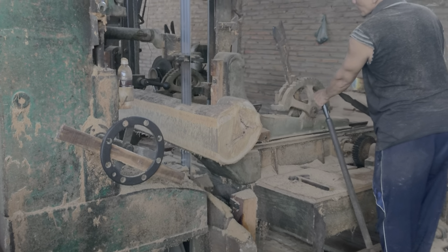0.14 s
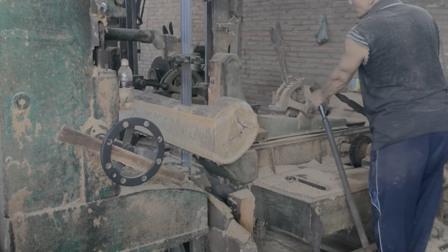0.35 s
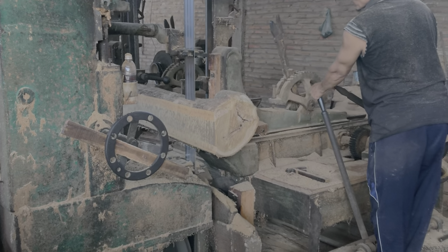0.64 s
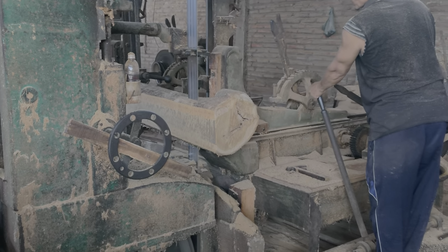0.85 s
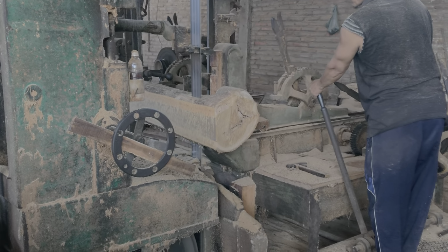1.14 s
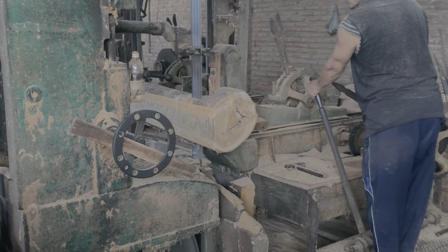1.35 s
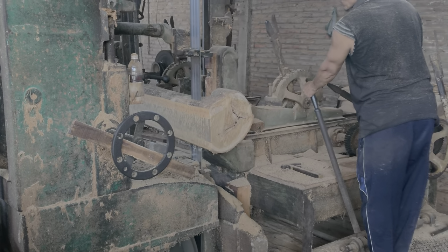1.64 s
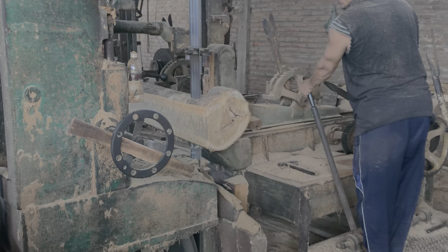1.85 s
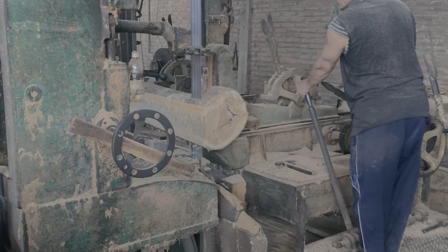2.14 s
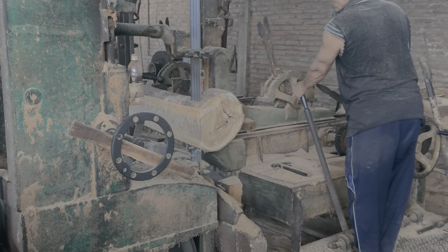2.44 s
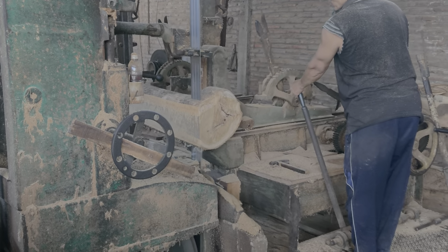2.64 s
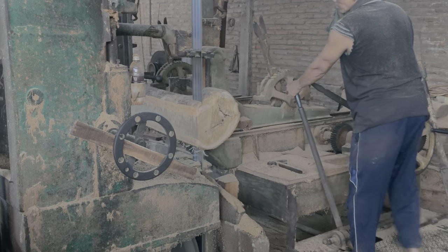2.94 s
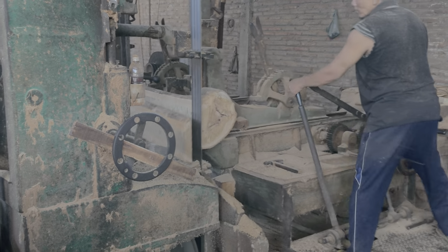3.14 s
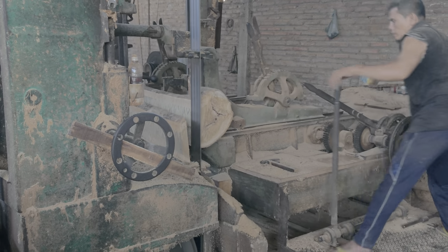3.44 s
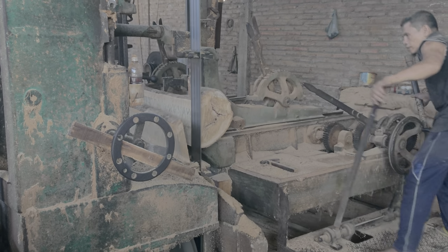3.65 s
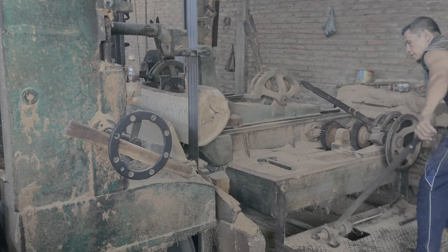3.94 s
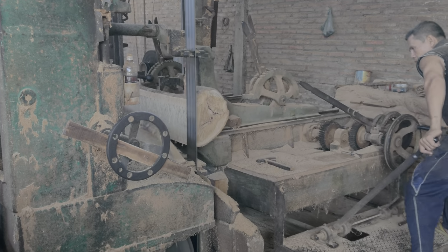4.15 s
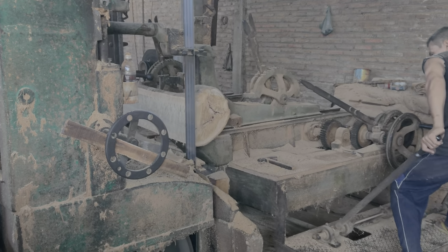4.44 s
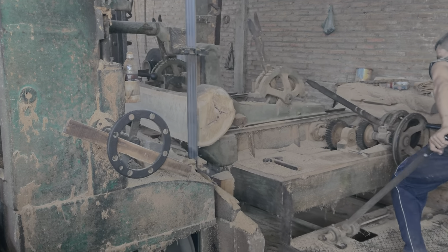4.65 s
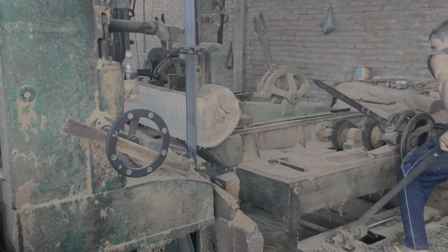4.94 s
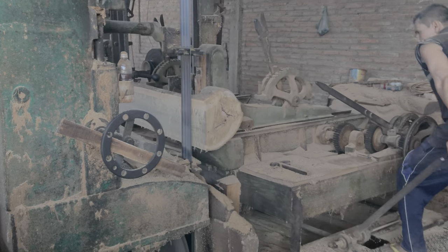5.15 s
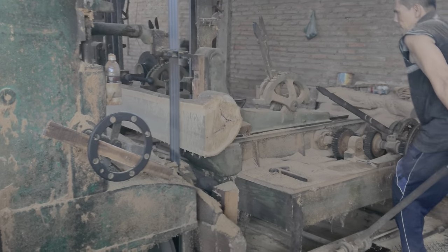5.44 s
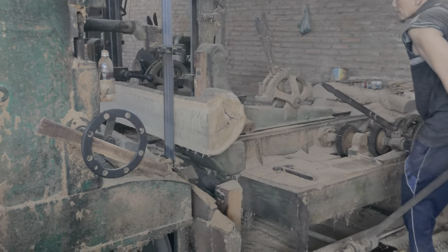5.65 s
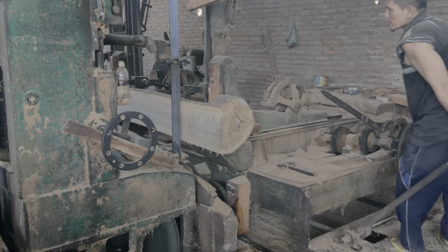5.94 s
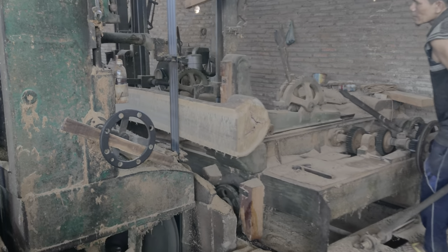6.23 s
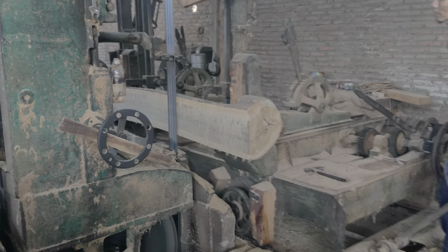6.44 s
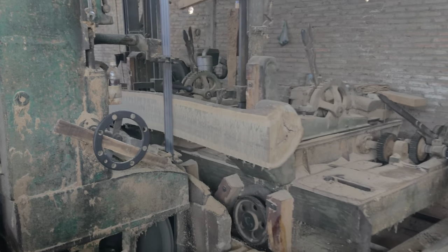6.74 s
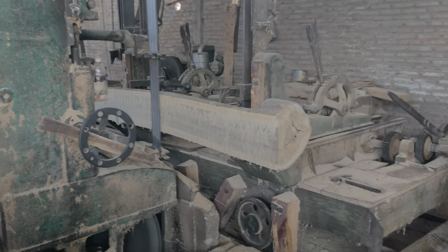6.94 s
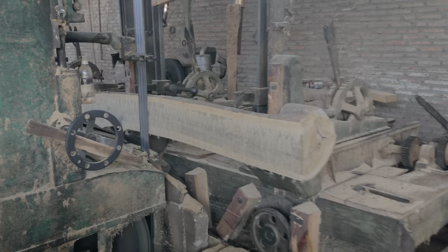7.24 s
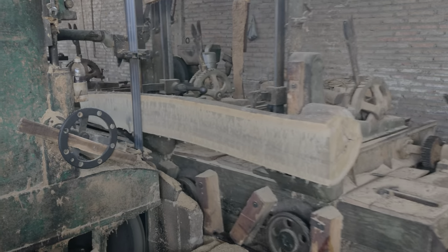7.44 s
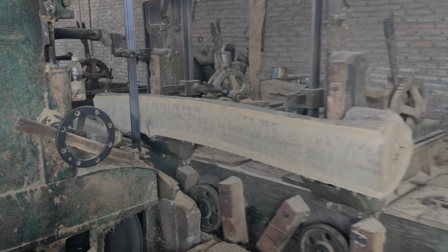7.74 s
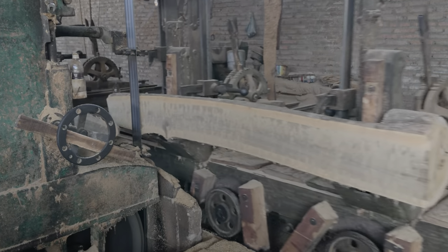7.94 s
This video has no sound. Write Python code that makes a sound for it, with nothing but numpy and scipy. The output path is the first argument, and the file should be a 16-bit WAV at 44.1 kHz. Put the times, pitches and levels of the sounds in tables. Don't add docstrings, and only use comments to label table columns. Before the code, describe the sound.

A big band saw rips a log with loud buzzing hiss, then exits the wood; the low hum fades and the idle blade rings and throbs.

```python
import sys
import numpy as np
from scipy import signal
from scipy.fft import rfft, irfft
from scipy.io import wavfile

SR = 44100
rng = np.random.default_rng(int(sys.argv[2]) if len(sys.argv) > 2 else 0)


def gain_from_db(level_db):
    decades = np.asarray(level_db, float) / 20
    return 10 ** decades


def wrap_up_sound(samples):
    columns = np.atleast_2d(samples).T
    tamed = np.clip(columns, -1, 1)
    steps = np.round(tamed * 32767).astype(np.int16)
    wavfile.write(sys.argv[1], SR, steps)


N = 357210
TIME_S = np.arange(N) / SR


def rms_one(x):
    return x / np.sqrt(np.mean(x ** 2))


def at_bins(points):
    hz = np.fft.rfftfreq(N, 1 / SR) + 1
    table_hz, table_db = np.array(points).T
    return np.interp(np.log(hz), np.log(table_hz), table_db), hz


def drift(rate):
    stride, settling = 40, 2000
    pole = np.exp(-2 * np.pi * rate * stride / SR)
    coarse = rng.standard_normal(N // stride + settling + 2)
    slow = signal.lfilter([1], [1, -2 * pole, pole * pole], coarse)[settling:]
    return np.interp(np.arange(N) / stride, np.arange(len(slow)), rms_one(slow))


def body_noise(colour, modes, patchy_db, count):
    db, hz = at_bins(colour)
    low_hz, high_hz = colour[0][0], colour[-1][0]
    inside = (hz > low_hz) & (hz < high_hz)
    power = 1
    for mode_hz, width_hz, top_db in modes:
        power = power + (gain_from_db(2 * top_db) - 1) / (1 + (2 * (hz - mode_hz) / width_hz) ** 2)
    body = rfft(rng.standard_normal(N)) * gain_from_db(db) * np.sqrt(power) * inside
    place = (count - 1) * np.log(hz / low_hz) / np.log(high_hz / low_hz)
    out = np.zeros(N)
    for k in range(count):
        band = irfft(body * np.clip(1 - np.abs(place - k), 0, 1), N)
        out += band * gain_from_db(patchy_db * drift(12.5))
    return rms_one(out)


def cycles(rate_hz, wobble_hz, wobble_rate):
    return 2 * np.pi * np.cumsum(rate_hz + wobble_hz * drift(wobble_rate)) / SR


def partial(phase, db, unsteady_db):
    level = np.sqrt(2) * gain_from_db(db + unsteady_db * drift(9.8))
    return level * np.sin(phase + rng.uniform(0, 2 * np.pi))


def since_exit():
    return np.clip(TIME_S - 3.022, 0, None)


def idling():
    t = since_exit()
    governor_s, run_up_s = 0.1205, 1.55
    remaining = run_up_s * np.exp(-t / run_up_s) - governor_s * np.exp(-t / governor_s)
    return 1 - remaining / (run_up_s - governor_s)


def machine_db(in_wood_db, let_go_db, speed_db):
    let_go = 1 - np.exp(-since_exit() / 0.03)
    return in_wood_db + let_go_db * let_go + speed_db * idling()


# (frequency [Hz], level [dB per Hz])
SELF_NOISE = [(20, -10), (60, 0), (200, -5.5), (1000, -14), (3500, -18.5), (6500, -33), (9500, -27),
              (16000, -24)]


def self_noise():
    return gain_from_db(-71.5) * body_noise(SELF_NOISE, [], patchy_db=1.0, count=2)


# (multiple of firing rate [1], loaded level [dB], idling level [dB])
UPPER_ORDERS = [(3, -36, -44), (4, -40, -36.5), (5, -46.5, -42), (6, -43, -43)]
# (turns per firing [1], loaded level [dB], idling level [dB])
GEARED_LINES = [(1.18, -54, -41), (1.62, -54, -42), (2.2, -54, -39)]
# (frequency [Hz], level [dB])
SHAFT_LINES = [(61, -48.5), (110, -43), (161, -45)]


def engine():
    free = idling()
    loaded_hz, idle_hz = 42.64, 51.43
    firing_hz = loaded_hz + (idle_hz - loaded_hz) * free
    phase = cycles(firing_hz, wobble_hz=0.16, wobble_rate=3.8)
    shed_hz, shed_width_hz = 86, 5
    boom = gain_from_db(-24.5) / np.sqrt(1 + (2 * (2 * firing_hz - shed_hz) / shed_width_hz) ** 2)
    off_boom = gain_from_db(-35)
    second_db = 10 * np.log10(boom ** 2 + off_boom ** 2)
    hum = partial(phase, -34 + 5 * free, 0.79)
    hum += partial(2 * phase, second_db, 1.5)
    for multiple, loaded_db, idle_db in UPPER_ORDERS:
        hum += partial(multiple * phase, loaded_db + (idle_db - loaded_db) * free, 1.1)
    for turns, loaded_db, idle_db in GEARED_LINES:
        hum += partial(turns * phase, loaded_db + (idle_db - loaded_db) * free, 3.4)
    for hz, db in SHAFT_LINES:
        hum += partial(cycles(hz, wobble_hz=0.51, wobble_rate=3.3), db, 1.0)
    return hum


# (frequency [Hz], level [dB per Hz])
ROAR = [(25, -17), (45, -1), (70, -4.5), (100, -3.5), (250, -3), (500, -2.5), (700, -3), (760, -0.5),
        (1100, -0.5), (1300, 0), (1800, -5), (2400, -12), (3200, -12)]
# (frequency [Hz], width [Hz], height over the colour [dB])
ROAR_MODES = [(755, 24, 3.5), (830, 63, 3), (952, 53, 3), (1080, 38, 4.5), (1435, 26, 2), (1610, 40, 3.5)]


def frame_roar():
    level_db = machine_db(-19.5, let_go_db=1, speed_db=-2)
    return gain_from_db(level_db) * body_noise(ROAR, ROAR_MODES, patchy_db=0.53, count=5)


# (time [s], lift [dB])
WELD = [(3.39, 3.5), (3.68, 4.5), (4.02, 4), (4.31, 4.5), (4.63, 4), (4.96, 3), (5.19, 3.5), (5.52, 5),
        (5.81, 4.5), (6.1, 4), (6.43, 3), (6.69, 4), (6.99, 4.5), (7.26, 5), (7.54, 3.5), (7.82, 4.5),
        (8.08, 3)]


def weld_db():
    lift = np.zeros(N)
    for s, db in WELD:
        width_s = np.where(TIME_S < s, 0.03, 0.06)
        lift += db * np.exp(-((TIME_S - s) / width_s) ** 2)
    return lift


# (frequency [Hz], level [dB per Hz])
WHINE = [(1400, -12), (1800, -1.5), (2200, -1.5), (2600, -2.5), (3050, -3), (3300, -12.5), (3800, -18)]
# (frequency [Hz], width [Hz], height over the colour [dB])
WHINE_MODES = [(2015, 45, 4.5), (2175, 40, 3.5), (2290, 37, 3), (2420, 24, 7.5), (2485, 35, 6),
               (2618, 60, 3.6)]


def wheel_whine():
    level_db = machine_db(-21.5, let_go_db=3, speed_db=0) + 0.17 * weld_db()
    return gain_from_db(level_db) * body_noise(WHINE, WHINE_MODES, patchy_db=1.1, count=6)


# (frequency [Hz], level [dB per Hz])
HISS = [(2600, -13), (3300, 0), (3900, -1.5), (4200, 2), (5500, 0.5), (6400, -5.5), (9500, -13),
        (12500, -8.5), (16000, -12)]
# (frequency [Hz], width [Hz], height over the colour [dB])
HISS_MODES = [(4155, 30, 6.5), (5120, 40, 1.5), (6705, 32, 10.6)]


def blade_hiss():
    level_db, lift = machine_db(-27.5, let_go_db=0, speed_db=4.5), weld_db()
    hiss = body_noise(HISS, HISS_MODES, patchy_db=0.5, count=4)
    split_hz = 7600
    top = signal.sosfilt(signal.butter(4, split_hz, "high", fs=SR, output="sos"), hiss)
    body = signal.sosfilt(signal.butter(4, split_hz, "low", fs=SR, output="sos"), hiss)
    top_db = 0.91 * lift - 1.5 + 0.9 * drift(60.0)
    return gain_from_db(level_db) * (gain_from_db(0.42 * lift) * body + gain_from_db(top_db) * top)


# (frequency [Hz], level [dB per Hz])
BLADE = [(2050, -12), (2130, 0), (2240, 0), (2320, -12)]
# (frequency [Hz], width [Hz], height over the colour [dB])
BLADE_MODES = [(2145, 12, 14), (2180, 18, 12.5), (2228, 14, 11)]


def blade_ring():
    level_db = machine_db(-38, let_go_db=10.5, speed_db=1.5)
    return gain_from_db(level_db) * body_noise(BLADE, BLADE_MODES, patchy_db=0.4, count=2)


# (time [s], tooth rate [Hz])
TOOTH_RATE = [
    (0, 345.5),
    (.8, 345.3),
    (1.2, 346.4),
    (1.8, 347),
    (2.3, 346.7),
    (3.02, 346),
]
# (multiple of tooth rate [1], level [dB])
TEETH = [(5, -44), (6, -38.5), (7, -38), (8, -40), (9, -42), (10, -47), (12, -51), (13, -45), (14, -48),
         (15, -45), (16, -51), (18, -48), (19, -51)]
# (frequency [Hz], level [dB per Hz])
SAWDUST = [(3000, -13), (6000, -4.5), (10000, -0.5), (12800, 0), (14000, 4), (16000, 1)]


def cut():
    tooth_s, tooth_hz = np.transpose(TOOTH_RATE)
    phase = cycles(np.interp(TIME_S, tooth_s, tooth_hz), wobble_hz=0.419, wobble_rate=3.03)
    sing_db = 9 * np.exp(-((TIME_S - 2.07) / 0.32) ** 4)
    tones = np.zeros(N)
    for multiple, db in TEETH:
        tones += partial(multiple * phase, db + sing_db * (multiple == 7), 3.0)
    dust_db = -21.5 + 3 * np.exp(-TIME_S / 0.46) + 0.79 * drift(7.8)
    pulse = (1 + 0.1 * np.cos(phase)) * gain_from_db(1.0 * drift(35.0))
    dust = body_noise(SAWDUST, [], patchy_db=0.5, count=3) * pulse
    exit_t60_s = 0.1
    return gain_from_db(-60 * since_exit() / exit_t60_s) * (tones + gain_from_db(dust_db) * dust)


# (time [s], length [s], start pitch [Hz], end pitch [Hz], level [dB])
SQUEAKS = [
    (7.785, .095, 1800, 2330, -23.5),
    (8.0, .08, 1950, 2250, -29),
]


def squeaks():
    out = np.zeros(N)
    for s, length, from_hz, to_hz, db in SQUEAKS:
        along = np.clip((TIME_S - s) / length, 0, 1)
        phase = cycles(from_hz + (to_hz - from_hz) * along, wobble_hz=20, wobble_rate=40)
        out += np.sin(np.pi * along) * partial(phase, db, 0.6)
    return out


def scene():
    machine = frame_roar() + wheel_whine() + blade_hiss() + blade_ring()
    drive_db = 7
    right = gain_from_db(drive_db) * (engine() + machine + cut() + squeaks())
    return np.array([self_noise(), right])


def band_limit(x):
    return signal.sosfilt(signal.butter(12, 15840, fs=SR, output="sos"), x)


# (frequency [Hz], level [dB])
PORT = [(6500, 0), (6900, -4.5), (7200, -10), (7700, -17.5), (8200, -19), (8350, -15), (9000, -15.5),
        (9300, -10.5), (10000, -1)]


def record(dry):
    rail, sharp = 0.87, 4.9
    clipped = dry / (1 + np.abs(dry / rail) ** sharp) ** (1 / sharp)
    port_db, hz = at_bins(PORT)
    mix = irfft(rfft(clipped) * gain_from_db(port_db) * (hz < 15750), N)
    return band_limit(mix)


dry = scene()
out = record(dry)
wrap_up_sound(out)
```